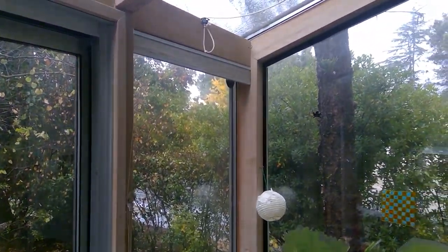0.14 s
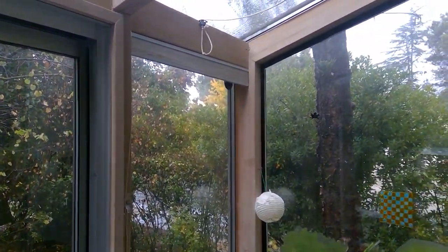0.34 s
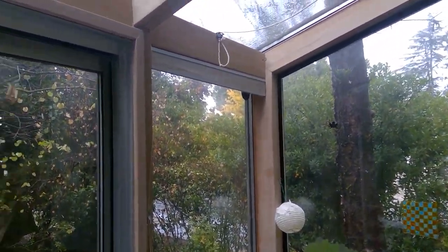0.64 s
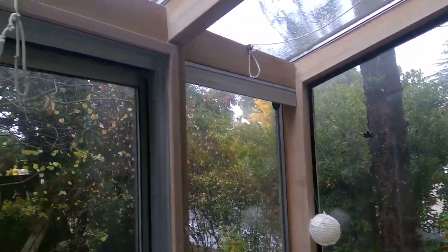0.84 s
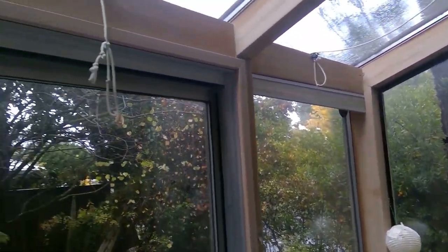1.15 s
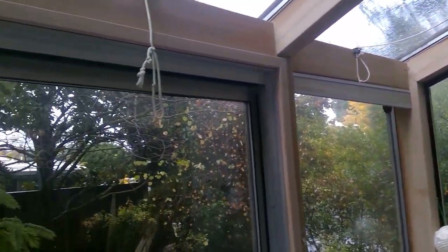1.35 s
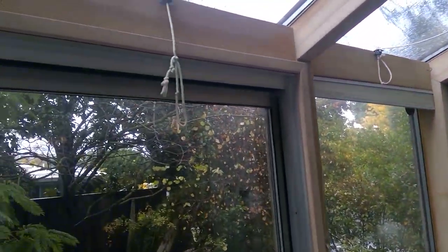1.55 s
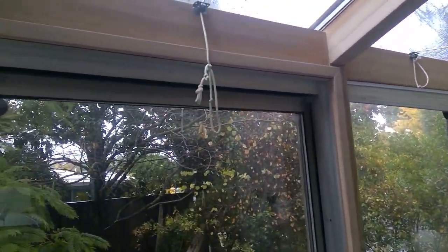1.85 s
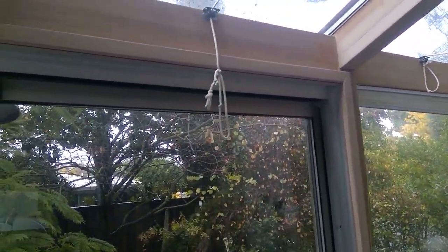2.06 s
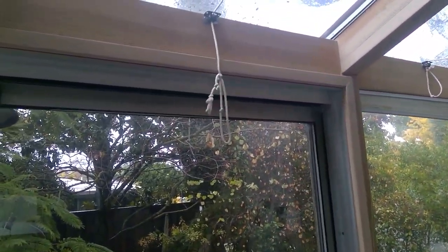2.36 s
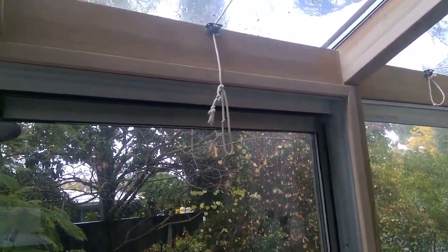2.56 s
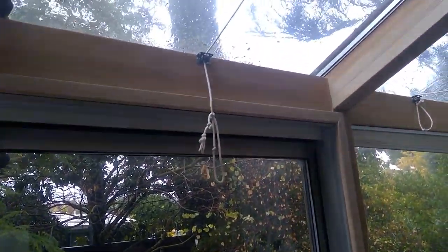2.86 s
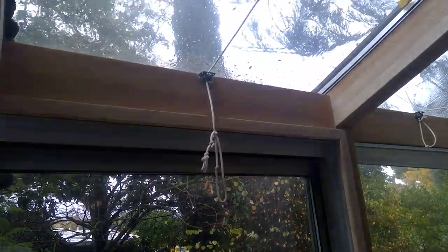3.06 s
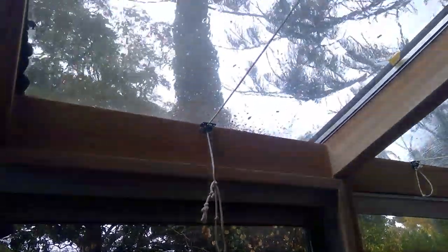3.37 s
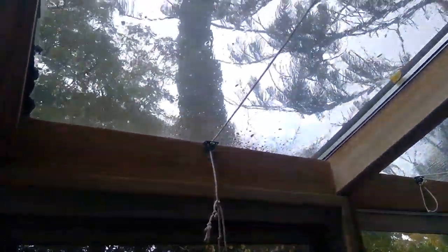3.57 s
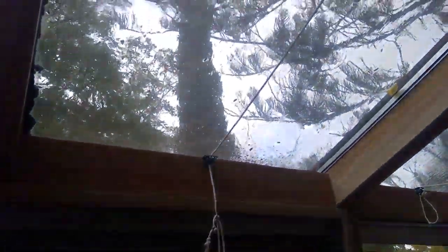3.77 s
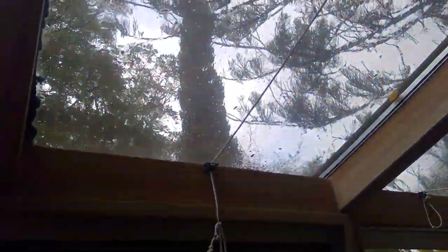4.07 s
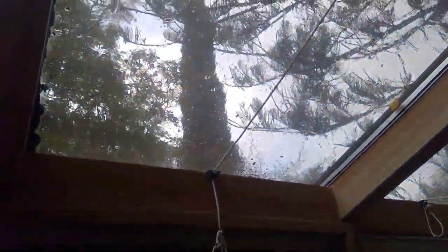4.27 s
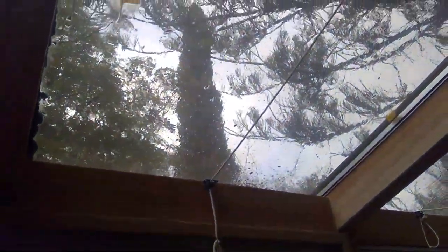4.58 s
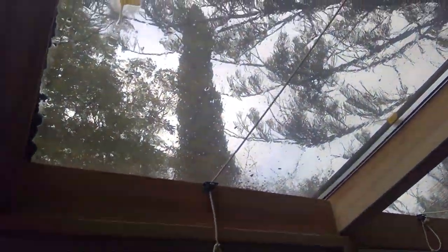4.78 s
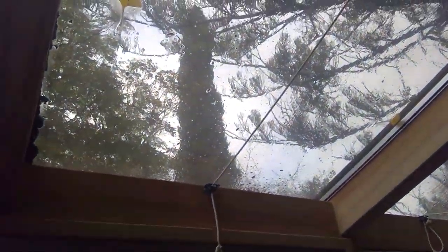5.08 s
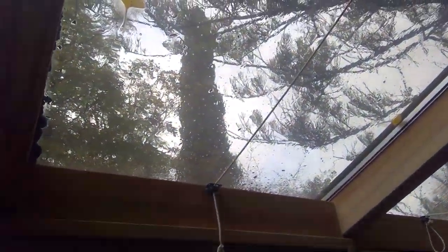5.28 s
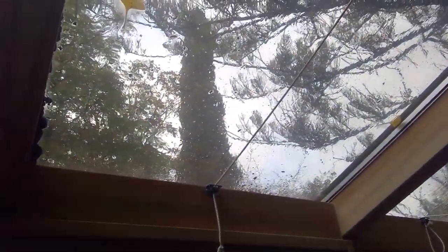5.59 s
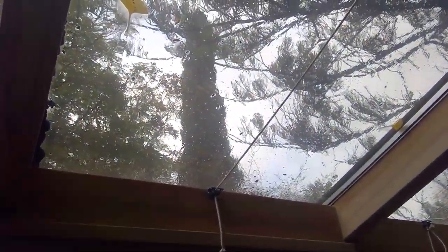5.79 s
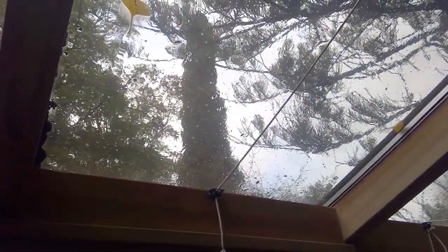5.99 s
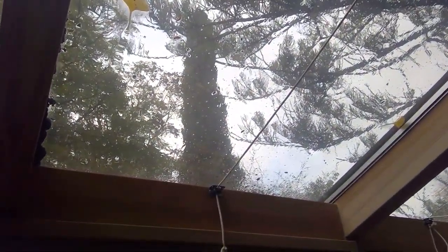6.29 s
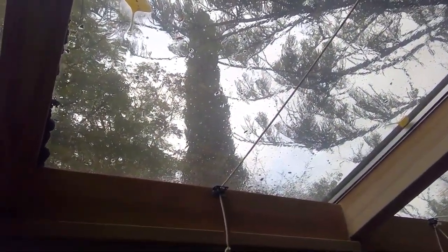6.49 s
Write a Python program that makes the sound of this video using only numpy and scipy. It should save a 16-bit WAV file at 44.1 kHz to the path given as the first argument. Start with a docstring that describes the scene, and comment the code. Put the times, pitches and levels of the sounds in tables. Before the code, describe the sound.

From inside a small glass-roofed sunroom, light rain drips irregularly on the panes. A soft dull knock opens at 0 s, with a fainter one at 0.14 s; very quiet clock clicks step once a second from about 0.05 s. A deeper knock lands at 1.27 s, tiny ticks near 1.6 to 2.4 s, and a soft knock at 2.6 s. At 3.3 s a close, low thud brings a faint spatter; at 3.7 s a crisp bright tick bursts with hissing droplets. A muted knock follows at 4.07 s, then the loudest, hard and glassy, at 4.72 s. Light ticks and thin spray patter from 4.9 to 5.6 s. It quiets, with a barely audible tick at 6.2 s and a last firm knock at 6.54 s. Low rumble, swelling slightly after 3.3 s, faint hum and thin hiss persist; impacts have short room tails and a slight low thump.

```python
"""A dull knock of a drop on a sunroom's glass roof, over a low rumble, a faint hum and a thin hiss.
Soft clock clicks follow once a second, with bright ticks of drops and showers of hissing droplets.
Knocks and ticks are clicks and noise rung through glass resonances, delayed like bending waves, with a short room tail.
Each knock and tick also sets low sine modes of the roof swaying; showers are random impulses, filtered and patchy.
The clock is ringing noise, the rumble and hum are wavering sines, and the hiss is shaped noise."""
import sys
import numpy as np
from scipy import signal
from scipy.fft import rfft, irfft, next_fast_len
from scipy.io import wavfile
from scipy.ndimage import uniform_filter1d, map_coordinates

SR = 44100
rng = np.random.default_rng(int(sys.argv[2]) if len(sys.argv) > 2 else 0)


def digitize_waveform(pressure):
    """Quantize a signal to 16-bit integers and store it at the path in sys.argv[1].

    Rows of a 2-D input are taken as channels; values are limited to [-1, 1].
    """
    field = np.atleast_2d(pressure).T
    bounded = np.clip(field, -1, 1)
    quanta = np.round(bounded * 32767).astype(np.int16)
    wavfile.write(sys.argv[1], SR, quanta)


N = 293265  # length [samples]

# Dull knocks of drops: (time [s], relative level [dB], body tone [Hz], second tone [Hz], top tone [Hz],
# fall below the body tone [dB per octave], step down above the top tone [dB], pane t60 [s],
# distance [m], left over right [dB])
DULL_KNOCKS = [(0.0, -42.5, 372, 494, 1180, 3.5, 0, 0.04, 0.75, 4.5),
               (.139, -47, 1414, 1680, 2200, -2, 36, 0.062, 5.3, -0.5),
               (1.265, -36.5, 347, 656, 955, 0.5, 31.5, 0.15, 2.7, -2.5),
               (1.557, -64, 244, 387, 450, 4.5, 28, 0.17, .8, 8),
               (2.607, -43, 1210, 2130, 3780, 1, 27.5, 0.076, 3.4, 0),
               (2.802, -63.5, 300, 510, 610, 2, 4, 0.081, 0.49, -3.5),
               (3.314, -33.5, 260, 1080, 3600, 2, 28.5, 0.014, .03, 1.5),
               (3.675, -44, 810, 730, 880, 2.5, 27.5, 0.34, 1.7, 0.5),
               (4.072, -41.5, 908, 710.6, 1484, 2, 23, 0.06, 3.06, 1.5),
               (4.722, -24, 1433, 1745, 4037, 6, 13, 0.045, 2.7, -0.5),
               (6.54, -33.5, 791, 376, 2388, 3.5, 13, 0.2, 3.2, -4)]
# Bright ticks of drops; the first, at 0.056 s, is a clock tick: (time [s], relative level [dB], pitch [Hz],
# treble lift [dB], pane t60 [s], distance [m], left over right [dB])
BRIGHT_TICKS = [(0.056, -69, 4620, -1, 0.03, 0.33, -0.5), (1.557, -71.5, 3770, 1, 0.029, .8, 16),
                (2.204, -77, 1610, -21, 0.48, 4, -9), (2.378, -61.5, 2630, -6, 0.12, 0.41, 11),
                (3.07, -48, 2120, -18, 0.088, 4.2, 3.5), (3.213, -66.5, 2450, -16, 0.069, .6, 2),
                (3.677, -43, 2360, 10.5, 0.13, 0.59, 1), (3.702, -26.5, 2305, 17, 0.074, 0.22, 1.5),
                (3.796, -47.5, 2370, 1.5, 0.27, 0.34, 1), (4.919, -51.5, 2465, -13.5, 0.093, 1.7, 9),
                (4.997, -59.5, 2445, -8, 0.038, 0.28, 3), (5.054, -50, 2744, 5.5, 0.024, 1.5, 8.5),
                (5.097, -50.5, 2545, 8.5, 0.041, 0.17, 2.5), (5.182, -50, 2420, -4.5, .15, .6, 2),
                (5.387, -53, 2445, 9.5, 0.18, .4, 8), (5.541, -49, 2375, 8.5, 0.18, 2.5, 1.5),
                (6.197, -66.5, 2280, -2.5, 0.077, 4, 2.5)]
# Resonances of the glazing that every knock and tick wakes: (frequency [Hz], relative level [dB])
GLAZING_MODES = [(377, -4.5), (514, -1.5), (842, 3.5), (1260, -6), (1382, -10.5), (1576, 3.4), (1713, -0.2),
                 (1941, -1.5), (2147, -1.5), (2454, 0), (2799, -2.5), (3056, -5.5), (3462, 5), (4236, 9),
                 (4874, -4), (5572, 0), (6272, 9)]
# Broad spectrum of a typical tick: (frequency [Hz], level [dB per Hz])
TICK_SPECTRUM = [(100, -3), (800, -27), (1200, -28), (1750, -17), (2300, -2), (3000, -3.5), (6300, -17),
                 (8000, -28), (12000, -35), (16000, -46.5)]
# Tones of a tick: (multiple of its pitch [ratio], relative level [dB])
TICK_PARTIALS = [(1, 2.5), (1.25, -4.5), (1.86, -0.5)]
# Left-right likeness of a distant strike: (frequency [Hz], likeness [-1 to 1])
STRIKE_LIKENESS = [(100, 1), (800, 0.89), (2000, 0.3), (5000, 0.29), (12000, .2)]
# Decay of the room: (frequency [Hz], t60 [s])
ROOM_DECAY = [(100, 0.66), (400, 0.32), (1400, 0.25), (4000, 0.34), (12000, 0.65)]
# The small room booms in the bass and is hollow just above it: (frequency [Hz], gain [dB])
ROOM_BOOM = [(45, -12), (92, 2.5), (150, -3.5), (210, 0.5)]
# Rumble swelling and sinking: (time [s], relative level [dB])
RUMBLE_LEVEL = [(0.2, -66), (2.95, -69), (3.45, -61.5), (5.73, -63), (6.5, -67.5)]
# Spectrum of the steady hiss: (frequency [Hz], level [dB per Hz])
HISS_SPECTRUM = [(29, -40.5), (50, -8), (98, -1.5), (151, -20.5), (192, -10), (341, -17), (394, -13.5),
                 (434, -29), (466, -11.5), (501, -25), (809, -24.5), (2330, -31.5), (15500, -44)]
# Stereo image of the hiss: (frequency [Hz], left-right likeness [-1 to 1])
HISS_LIKENESS = [(60, 0.89), (180, 1), (550, 0.47), (1650, 0.16), (4970, -0.11), (15000, -0.12)]
# Parts of one clock step: (delay after the step [s], frequency [Hz], width of each of two filter stages [Hz],
# relative level [dB], t60 [s])
CLOCK_PARTS = [(0.0037, 1256, 111, -64, 0.23), (.024, 659, 86, -57.5, 0.16),
               (0.048, 4400, 2100, -74, 0.077)]
# Showers of fine droplets: (time [s], relative level [dB], treble [dB], rise [s], hold [s], release t60 [s])
SHOWERS = [(3.313, -67.5, -5, 0.031, 0.029, 0.33), (3.581, -56, 3.5, .03, 0.055, 0.23),
           (3.672, -46.5, 2, .035, .02, .22), (5.043, -55, -4, 0.14, 0.086, 0.94),
           (5.432, -57.5, -1.5, 0.09, 0.044, 0.36)]
# Broad spectrum of a shower: (frequency [Hz], level [dB per Hz])
SHOWER_SPECTRUM = [(290, -40), (500, -17.5), (781, -22), (982, -15.5), (1170, -36.5), (1270, -20),
                   (1580, -31.5), (2360, -3), (3680, -18), (4980, -14), (5510, -16.5), (7030, -20),
                   (10800, -31.5), (15500, -39)]
# Resonances under a shower: (frequency [Hz], width before halving [Hz], unused);
# every resonance gets the same level, mode_db
SHOWER_MODES = [(2160, 230, 0), (3720, 120, -11), (4150, 130, -10), (4910, 200, -11), (6067, 120, -17),
                (6800, 76, -17), (7163, 190, -18)]

BEND_S_PER_M = 0.0031  # lag of the bending waves along the glass
NEAR_M = 0.23  # strikes nearer than about this differ more between left and right
TICK_HZ = 2580  # pitch at which TICK_SPECTRUM applies unshifted
SWAY_CEILING_DB = -29  # strikes above this level all sway the roof alike
TOP_HZ = 15800  # upper band limit


def amp(db):
    """Decibels to gain."""
    return 10 ** (np.asarray(db) / 20)


def unit(x):
    """x at rms 1."""
    return x / np.sqrt(np.mean(x ** 2) + 1e-20)


def along(points, hz):
    """(Hz, value) points read on a log frequency axis."""
    f, values = np.transpose(points)
    return np.interp(np.log(hz + 1), np.log(f + 1), values)


def filtered(x, response):
    """x times a complex response of frequency, padded with silence."""
    n = x.shape[-1]
    padded = 2 * next_fast_len(n // 2 + SR // 10)
    spectrum = rfft(x, padded) * response(np.fft.rfftfreq(padded, 1 / SR))
    return irfft(spectrum, padded)[..., :n]


def causal(gain):
    """Minimum-phase response with this gain: it rings only after the blow."""
    cepstrum = irfft(np.log(np.maximum(gain, 1e-7)))
    half = len(cepstrum) // 2
    cepstrum[1:half] *= 2
    cepstrum[half + 1:] = 0
    return np.exp(rfft(cepstrum))


def resonance(f, hz, width_hz):
    """One damped mode, gain 1 at its centre."""
    return 1j * f * width_hz / (hz * hz - f * f + 1j * f * width_hz)


def stereo(pair, likeness):
    """Blend two signals into left and right of a given likeness at each frequency."""
    def mid_side(f):
        turn = np.arccos(np.clip(along(likeness, f), -1, 1)) / 2
        return np.array([np.cos(turn), np.sin(turn)])

    mid, side = filtered(pair, mid_side)
    return np.array([mid + side, mid - side])


def add(track, s, sound):
    """Mix a sound in at time s, or at the start if s is negative."""
    part = track[..., max(round(s * SR), 0):][..., :sound.shape[-1]]
    part += sound[..., :part.shape[-1]]


def room_tail(t, build_s):
    """Reflections build up, then each frequency dies at its own speed."""
    hz, when, z = signal.stft(rng.standard_normal((2, len(t))), SR, nperseg=256)
    decay = amp(-60 * when / along(ROOM_DECAY, hz)[:, None])
    tail = signal.istft(z * decay, SR, nperseg=256)[1]
    return tail[:, :len(t)] * (1 - np.exp(-t / build_s))


def pane_colour(f, shape_db, tones, tone_width_hz, glass_db, glass_width_hz):
    """Gain of a struck pane: a broad spectrum, the glazing's resonances and the tones of the spot hit."""
    shared = sum(np.abs(amp(glass_db + db) * resonance(f, hz, glass_width_hz)) ** 2
                 for hz, db in GLAZING_MODES)
    own = sum(np.abs(amp(db) * resonance(f, hz, tone_width_hz + hz / 50) ** 2) ** 2 for hz, db in tones)
    return unit(amp(shape_db + along(ROOM_BOOM, f)) * np.sqrt(1 + shared + own))


def strike(colour, t60, distance, pan_db, ring_hz, treble_t60, room_db, click_db, scatter):
    """A click reaches the ear through the pane, then its crowd of modes rings and the room answers."""
    t, early = np.arange(SR * 2 // 5) / SR, slice(SR // 40)
    lag, farness = BEND_S_PER_M * distance, distance / (distance + NEAR_M)
    # The farther the bending waves have come, the more softly the ring sets in.
    fade = amp(-60 * t / t60) * (1 - np.exp(-t / (0.0009 + scatter * lag)))
    fade /= np.sqrt(np.mean(fade[early] ** 2))
    ring = fade * rng.standard_normal((2, len(t)))
    tap = ring + amp(room_db) * room_tail(t, build_s=0.0056)
    # Everything above the main ring dies sooner.
    low = filtered(tap, lambda f: 1 / (1 + (f / ring_hz) ** 4))
    treble = (tap - low) * amp(-60 * t / treble_t60)
    tap = stereo(low + treble, np.array(STRIKE_LIKENESS) * [1, farness])
    # The nearer the strike, the later its first click falls on the left than on the right.
    apart = round((1 - farness) ** 2 * 0.0012 * SR)
    tap[[0, 1], [SR // 1000 + apart, SR // 1000]] += amp(click_db) * np.sqrt(early.stop)

    def bending_delay(f):
        # Bending waves in glass travel as the root of frequency, so the bass arrives late.
        return np.exp(-2j * np.pi * f * lag * 2 * np.sqrt(700 / (f + 200)))

    tap = filtered(tap, lambda f: causal(colour(f)) * bending_delay(f))
    return tap * amp([[pan_db / 2], [-pan_db / 2]])


def knocks(tone_db, top_db, room_db):
    """Dull knocks: the spectrum slopes away on both sides of the body tone, rising where the fall is negative."""
    out = np.zeros((2, N))
    for s, db, body_hz, second_hz, top_hz, fall, step_db, t60, distance, pan_db in DULL_KNOCKS:
        def colour(f):
            octaves = np.log2((f + 20) / body_hz)
            above = np.maximum(np.log2((f + 20) / top_hz), 0)
            slope = fall * np.minimum(octaves, -1.93 * octaves)  # 1.93 times as steep on the treble side
            # A step at 38 dB per octave, and a roll-off of 6.5 dB per octave that goes on.
            cut = np.minimum(38 * above, step_db) + 6.5 * above
            tones = [(body_hz, tone_db), (second_hz, tone_db + 0.5), (top_hz, top_db)]
            # A damped pane has broader tones.
            return pane_colour(f, slope - cut, tones, tone_width_hz=70 + 4.2 / t60,
                               glass_db=5.0, glass_width_hz=28)

        # Near knocks are drier.
        wet_db = room_db + 10 * np.log10(distance / (distance + NEAR_M))
        knock = strike(colour, t60, distance, pan_db, ring_hz=1.9 * body_hz, treble_t60=0.3,
                       room_db=wet_db, click_db=-10.5, scatter=0.52)
        # Start early by the nominal lag.
        add(out, s - BEND_S_PER_M * distance, amp(db) * knock)
    return out


def sway(hz, t60, rise_s, db):
    """A low mode of the roof swells after each knock and tick, as strongly as it hits, up to a ceiling."""
    out, t = np.zeros(N), np.arange(2 * SR) / SR
    for s, strike_db, *_ in DULL_KNOCKS + BRIGHT_TICKS:
        swing = np.sin(2 * np.pi * hz * t + rng.uniform(0, 2 * np.pi))
        decay = amp(db + min(strike_db, SWAY_CEILING_DB) - 60 * t / t60)
        add(out, s, decay * (1 - np.exp(-t / rise_s)) ** 2 * swing)
    return out


def drift(rate_hz):
    """A smooth random curve through values drawn at this rate."""
    return map_coordinates(rng.standard_normal(40), [np.arange(N) * rate_hz / SR], mode="mirror")


def wavering_tone(hz, turns, depth_db):
    """A sine whose level and phase drift at random."""
    level = amp(depth_db * drift(rate_hz=1.7))
    cycles = hz * np.arange(N) / SR + turns * drift(rate_hz=2.3)
    return unit(level * np.sin(2 * np.pi * cycles))


def background(hiss_db, rumble_db, hum_db):
    """A low rumble and a faint hum, both wavering sines, and a thin steady hiss of shaped noise."""
    s, level_db = np.transpose(RUMBLE_LEVEL)
    rumble_level = np.interp(np.arange(N) / SR, s, level_db)
    rumble = amp(rumble_level + rumble_db) * wavering_tone(hz=31.4, turns=0.17, depth_db=2.0)
    hum = amp(hum_db) * wavering_tone(hz=86.0, turns=0.12, depth_db=4.5)
    noise = stereo(rng.standard_normal((2, N)), HISS_LIKENESS)
    hiss = unit(filtered(noise, lambda f: amp(along(HISS_SPECTRUM, f))))
    return rumble + hum + amp(hiss_db) * hiss


def clock(first_s, db):
    """Once a second the movement steps: a light click, then the hand settles and the case answers lower."""
    out, t = np.zeros((2, N)), np.arange(SR // 4) / SR
    for s in np.arange(first_s, N / SR, 1):
        for delay, hz, width_hz, level_db, t60 in CLOCK_PARTS:
            noise = rng.standard_normal((2, len(t)))
            ring = unit(filtered(noise, lambda f: resonance(f, hz, width_hz) ** 2))
            fade = amp(db + level_db - 60 * t / t60) * (1 - np.exp(-t / 0.0016))
            add(out, s + delay, ring * fade)
    return stereo(out, [(1000, 0.77)])


def ticks(tone_db, tone_loss):
    """Bright ticks: one spectrum moved to each pitch; harder contact gives more treble and less tone."""
    out = np.zeros((2, N))
    for s, db, pitch_hz, treble_db, t60, distance, pan_db in BRIGHT_TICKS:
        def colour(f):
            # The treble lift comes in over the octave above the pitch.
            lift = treble_db * np.clip(np.log2((f + 1) / pitch_hz), 0, 1)
            shape = along(TICK_SPECTRUM, f * TICK_HZ / pitch_hz) + lift
            tones = [(ratio * pitch_hz, tone_db - tone_loss * treble_db + level)
                     for ratio, level in TICK_PARTIALS]
            return pane_colour(f, shape, tones, tone_width_hz=130, glass_db=6.5, glass_width_hz=26)

        tick = strike(colour, t60, distance, pan_db, ring_hz=1.6 * pitch_hz, treble_t60=0.5,
                      room_db=-2.0, click_db=-17, scatter=0.25)
        add(out, s - BEND_S_PER_M * distance, amp(db) * tick)
    return out


def spatter(rate_hz, ring_db, spray_db, patchy_db, mode_db):
    """Tiny droplets hiss on the glass in shifting patches and keep it ringing; showers rise, hold and die."""
    out, t = np.zeros((2, N)), np.arange(N) / SR
    hits = (rng.random((2, N)) < rate_hz / SR) * rng.standard_normal((2, N))
    z = signal.stft(stereo(hits, [(1000, 0.24), (6000, 0.2)]), nperseg=512)[2]
    # Smoothed random gains over frequency and time make the patches.
    patches = uniform_filter1d(rng.standard_normal(z.shape[1:]), size=3, axis=0)
    patches = uniform_filter1d(patches, size=9, axis=1)
    hits = signal.istft(z * amp(patchy_db * unit(patches)), nperseg=512)[1][:, :N]
    ring = unit(filtered(hits, lambda f: resonance(f, 2420, 510) ** 2))

    def spray_gain(f):
        modes = sum(np.abs(amp(mode_db) * resonance(f, hz, width_hz / 2)) ** 2
                    for hz, width_hz, _ in SHOWER_MODES)
        return amp(along(SHOWER_SPECTRUM, f)) * np.sqrt(1 + modes)

    spray = unit(filtered(hits, spray_gain))
    body = filtered(spray, lambda f: 1 / (1 + (f / 8000) ** 6))  # the treble starts at 8 kHz
    for s, db, treble_db, rise_s, hold_s, t60 in SHOWERS:
        release = np.maximum(t - s - rise_s - hold_s, 0)
        flow = np.clip((t - s) / rise_s, 0, 1) ** 2 * amp(db - 60 * release / t60)
        hiss = body + amp(treble_db) * (spray - body)
        out += flow * (amp(ring_db) * ring + amp(spray_db) * hiss)
    return out * amp([[1], [-1]])  # a little to the left


def scene():
    """Knocks, ticks, roof, showers, clock and background together."""
    taps = knocks(tone_db=8.5, top_db=4.5, room_db=-0.5) + ticks(tone_db=12.5, tone_loss=0.3)
    roof = sway(hz=27.7, t60=0.4, rise_s=0.03, db=-3.5) + sway(hz=90.0, t60=0.48, rise_s=0.025, db=-30)
    showers = spatter(rate_hz=3500, ring_db=-13, spray_db=2, patchy_db=6.5, mode_db=6.5)
    steady = background(hiss_db=-70, rumble_db=2.5, hum_db=-81)
    return taps + roof + showers + clock(first_s=0.053, db=-2.5) + steady


def record(dry):
    """Remove everything above the band limit."""
    return filtered(dry, lambda f: f < TOP_HZ)


dry = scene()
out = record(dry)
digitize_waveform(out)
```